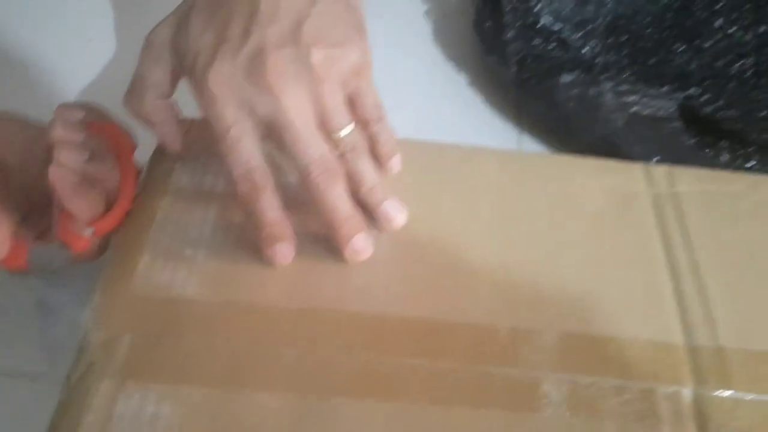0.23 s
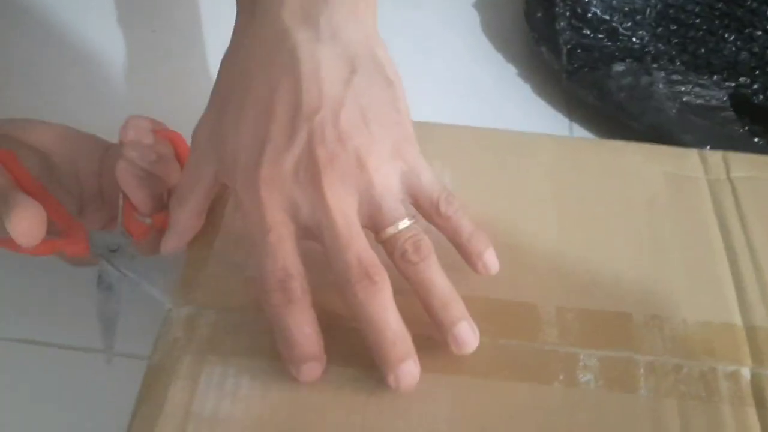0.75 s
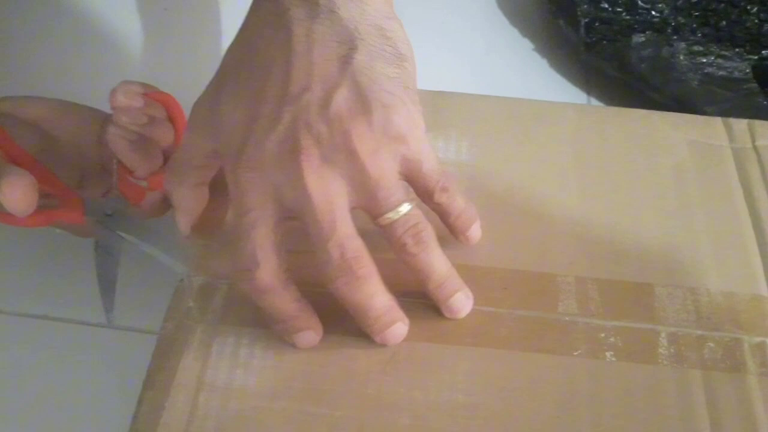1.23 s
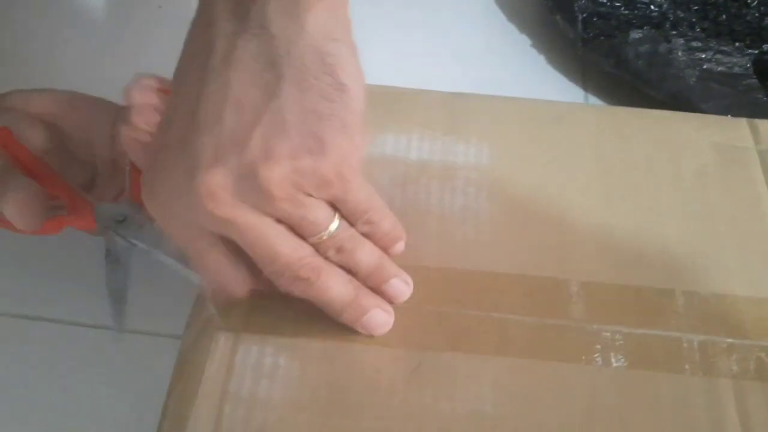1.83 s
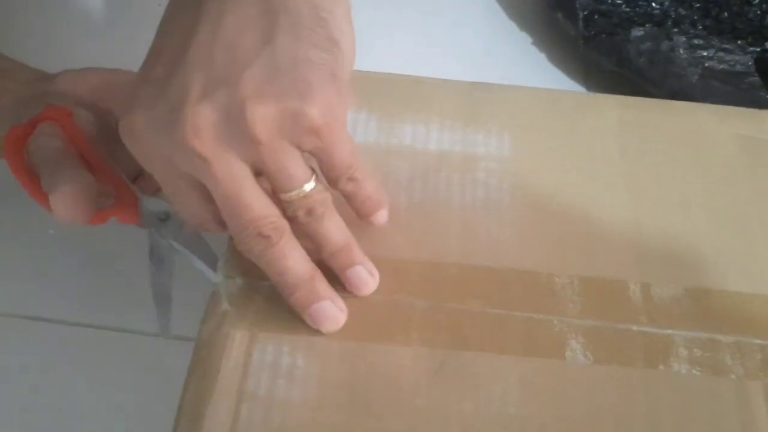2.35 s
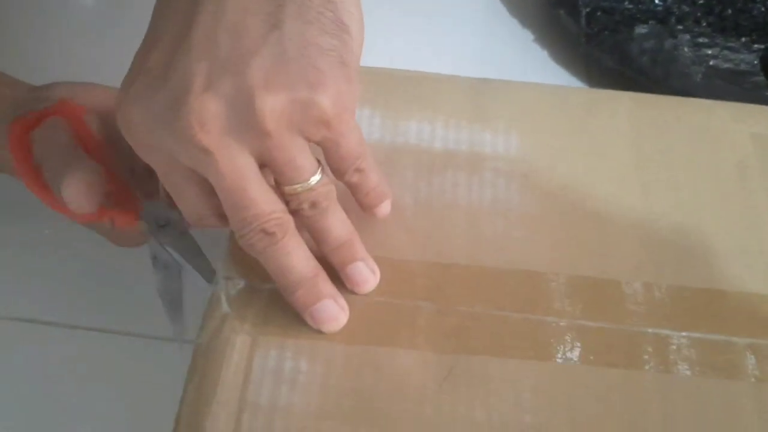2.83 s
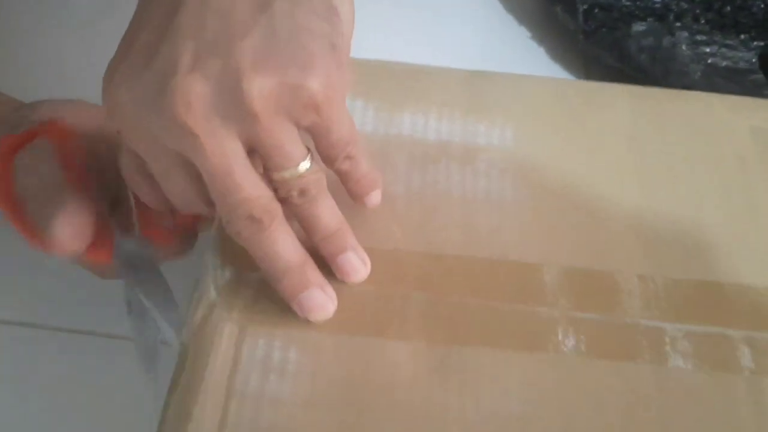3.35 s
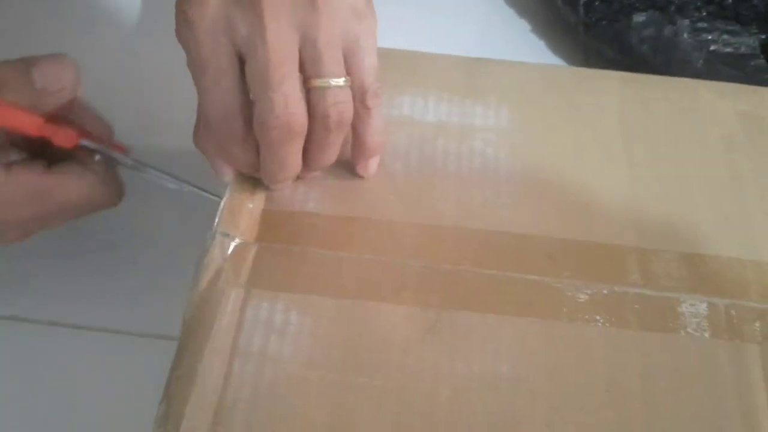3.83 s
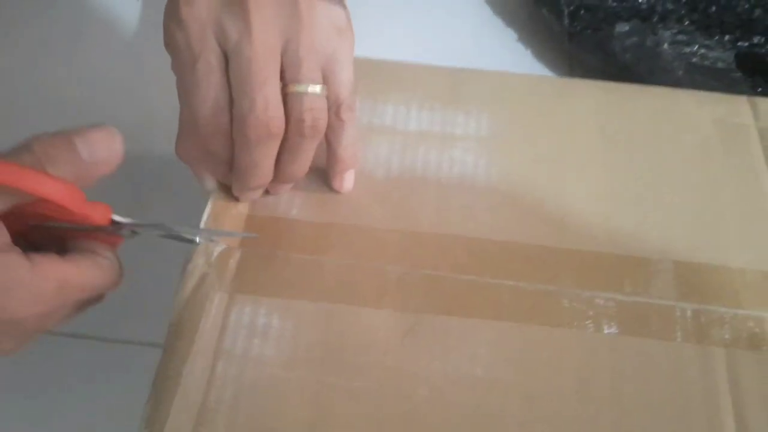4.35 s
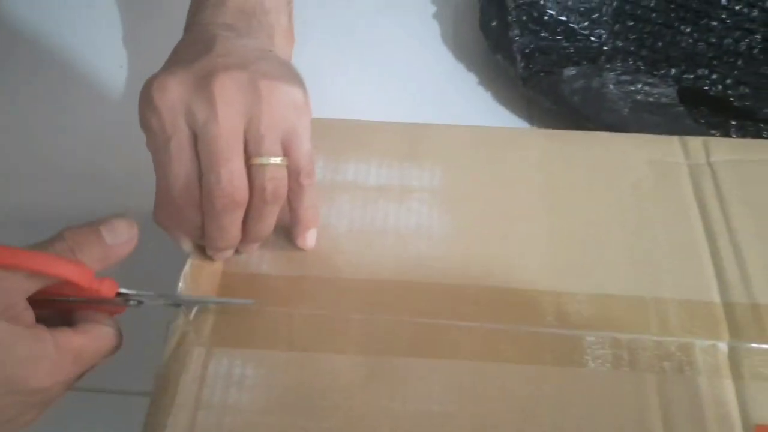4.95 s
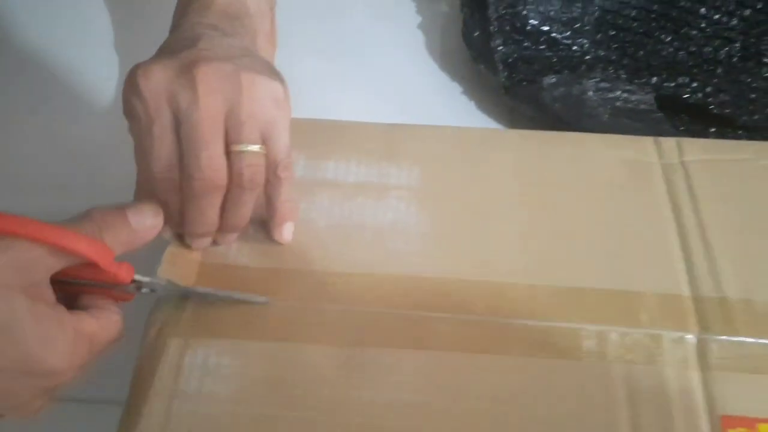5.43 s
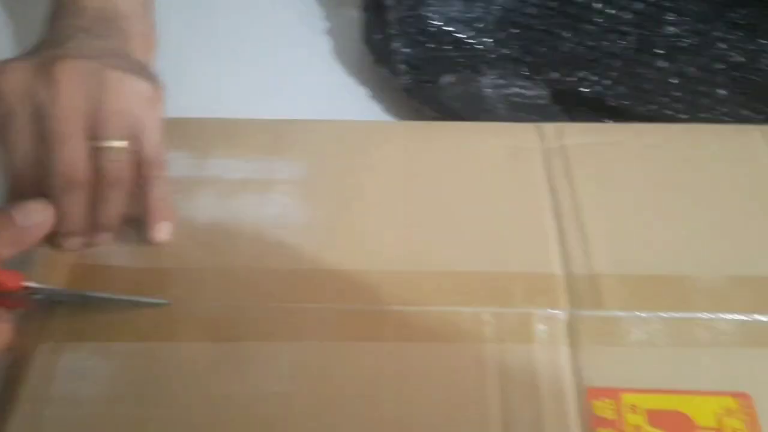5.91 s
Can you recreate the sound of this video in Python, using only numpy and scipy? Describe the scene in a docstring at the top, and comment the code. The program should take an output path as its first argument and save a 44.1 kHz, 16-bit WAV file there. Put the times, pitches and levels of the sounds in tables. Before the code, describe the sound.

Soft hand rubs on a cardboard lid give way to crackly blade strokes, sharp tape snaps and dull box thumps, with a distant engine droning.

```python
"""Scissors work into the packing tape at the edge of a cardboard box, close to a phone in a small tiled room.
First a hand slides over the lid in filtered friction noise, as noise bursts make tape snap and blades knock the box.
Then blade strokes take over, with crackle and breaking fibres; the lid booms as decaying low sines,
and near the end the rasp turns papery in the seam. Throughout, an engine hums through the walls as harmonics
of its firing rate, sinking in speed, picking up and sinking again, over noise and a thin drone."""
import sys
import numpy as np
from scipy import signal
from scipy.fft import rfft, irfft, next_fast_len
from scipy.io import wavfile
from scipy.ndimage import uniform_filter1d, map_coordinates

SR = 44100
rng = np.random.default_rng(int(sys.argv[2]) if len(sys.argv) > 2 else 0)


def output_pcm(signal):
    """Save a mono or channel-first signal as 16-bit PCM at the path in sys.argv[1].

    Samples are clipped to [-1, 1] before scaling.
    """
    pcm = np.clip(np.atleast_2d(signal).T, -1, 1) * 32767
    wavfile.write(sys.argv[1], SR, np.round(pcm).astype(np.int16))


N = 272538

# Colour of the room air. Each row: frequency in Hz, relative density in dB per Hz.
AIR_SPECTRUM = [(20, -30), (45, -16), (95, 13), (200, 4), (320, -11), (600, -20), (1000, -19.5),
                (3000, -28.5), (9000, -36), (13500, -24), (16000, -36)]
# Likeness of left and right in diffuse sound. Each row: frequency in Hz, correlation from 0 to 1.
LEFT_RIGHT_LIKENESS = [(130, 0.97), (290, 0.89), (640, 0.54), (1400, 0), (3000, 0)]
# Reverberation of the tiled room. Each row: frequency in Hz, 60 dB decay time in seconds.
ROOM_DECAY = [(200, 0.36), (14000, 0.1)]
# Speed of the engine. Each row: time in seconds, firing rate in Hz.
FIRING_RATE = [(0, 31.4), (.45, 30.9), (.75, 30.1), (1, 29.85), (1.43, 28.95), (2.42, 27.45), (3.75, 24.5),
               (4.33, 27.9), (5.1, 29.35), (5.56, 29.4), (5.75, 27.1), (6.17, 25.1)]
# Swelling and fading of the third order. Each row: time in seconds, level in dB.
THIRD_ORDER_LEVEL = [(0, -54.5), (.68, -44.5), (1.1, -52), (1.85, -52.5), (2.3, -72), (5.35, -68),
                     (5.7, -52)]
# Swelling and fading of the fourth order. Each row: time in seconds, level in dB.
FOURTH_ORDER_LEVEL = [(.45, -62), (.77, -38.5), (1, -40.5), (1.398, -29), (1.7, -38), (2.05, -40),
                      (2.48, -46.5), (2.7, -63), (3.2, -58), (3.6, -45), (4.05, -61), (4.3, -49.5),
                      (5.1, -48), (5.27, -74), (5.5, -49)]
# Swelling and fading of the fifth order. Each row: time in seconds, level in dB.
FIFTH_ORDER_LEVEL = [(0, -51.5), (.7, -43), (.92, -60), (1.15, -48.5), (2.4, -58.5), (3, -62), (4.1, -57),
                     (4.42, -47), (4.95, -45), (5.3, -57.5), (5.5, -46), (6.17, -55.5)]
# Colour of the clatter through the walls. Each row: frequency in Hz, relative density in dB per Hz.
CLATTER_SPECTRUM = [(100, -10.5), (200, 4), (340, 1), (650, -5), (1100, -30), (3000, -29.5)]
# Flexing of the whole lid under the hand. Each row: start in seconds, level in dB before the slow rise.
LID_FLEXES = [(3.74, -28.5), (3.859, -33), (5.788, -28), (5.86, -30), (6.07, -27.5)]
# Resonances of the box. Each row: centre in Hz, width in Hz, gain in dB.
BOX_MODES = [(178, 74, -4), (259.5, 42, 2.5), (285, 25.6, 6.5), (345.3, 29.6, 5.5), (443, 28, -1.5),
             (526, 80, -3), (660, 147, -3.5), (965, 665, -12), (1163, 237, -10)]
# Blows on the box. Each row: start in seconds, relative level in dB, relative crunch level in dB.
BOX_KNOCKS = [(0.387, -27, -16.5), (0.836, -41, -5.5), (1.859, -31.5, -21.5), (2.756, -25.5, -9),
              (2.814, -26, -16.5), (2.821, -24, -19.5), (3.240, -25.5, -19), (3.250, -29, -12),
              (3.287, -26, -14), (3.414, -29.5, -13.5), (3.735, -25, -27), (4.994, -33, -15),
              (5.051, -28.5, -12.5), (5.062, -26, -14.5), (5.709, -25.5, -13), (5.837, -29.5, -7.5)]
# Tape snaps and blade ticks. Each row: start in seconds, relative level in dB, centre in Hz.
TAPE_SNAPS = [(0.3886, -24, 10500), (0.603, -38.5, 9500), (0.7702, -30.5, 5000), (1.5878, -34, 4500),
              (2.1062, -39, 6900), (2.322, -25.5, 10000), (2.7556, -18, 12500), (2.812, -30, 1700),
              (2.816, -29.5, 1300), (2.892, -33.5, 6000), (3.1375, -34, 13700), (3.288, -26.5, 11400),
              (3.290, -35, 3500), (3.3554, -30, 11000), (3.394, -40, 12700), (3.414, -29.5, 11600),
              (3.5635, -29, 13200), (3.569, -36, 12900), (3.6013, -32, 12500), (4.596, -33, 13500),
              (4.904, -48.5, 4200), (4.914, -49, 4600), (4.9216, -35, 5500), (5.004, -35, 1600),
              (5.0638, -29.5, 12700), (5.4522, -26.5, 5000), (5.7100, -20.5, 1700), (5.8386, -24, 11000)]
# Lean of the direct crack to one side. Each row: centre in Hz, left over right in dB.
SNAP_LEAN = [(1600, 4.5), (4500, 10), (12000, 14)]
# Colour of the rubbing hiss and tape crackle. Each row: frequency in Hz, relative density in dB per Hz.
HISS_SPECTRUM = [(1000, -19), (2500, -3), (4800, -0.5), (7000, -3), (8500, -1), (9900, -6.5), (12500, 0),
                 (16000, -6.5)]
# Colour of the biting blade and the crunch. Each row: frequency in Hz, relative density in dB per Hz.
RASP_SPECTRUM = [(300, -13), (800, -10.5), (1300, -3.5), (1900, -3.5), (3300, -7), (6000, -15.5),
                 (16000, -14.5)]
# Hand slides over the lid. Each row: start in seconds, length in seconds, relative hiss and board levels in dB.
HAND_SLIDES = [(0, 0.033, -64, -57), (.5, 0.41, -64.5, -53), (.79, 0.11, -57, -61), (1.01, 0.041, -68, -61),
               (1.36, 0.65, -57.5, -52.5), (1.81, 0.028, -56, -47.5), (1.88, 0.26, -81.5, -59),
               (2.04, 0.11, -55.5, -47), (2.33, 0.079, -59.5, -44.5), (2.5, 0.21, -67.5, -55)]
# Blade pushes into tape and board. Each row: start in seconds, length in seconds, relative hiss and board
# levels in dB.
BLADE_PUSHES = [(.16, 0.039, -56, -45), (.39, 0.082, -61, -48), (2.75, 0.038, -52, -39),
                (2.85, 0.099, -66, -48.5), (3.18, .05, -61.5, -46.5), (3.25, 0.21, -59.5, -45.5),
                (3.595, 0.025, -49.5, -45), (3.72, 0.069, -51, -48), (3.86, 0.12, -69, -63),
                (4.01, 0.018, -64, -77), (4.24, 0.11, -60.5, -54), (4.62, 0.37, -72.5, -60),
                (4.97, 0.11, -62.5, -44), (5.21, 0.18, -58.5, -51), (5.455, 0.065, -53, -42.5),
                (5.665, 0.092, -52, -44), (5.78, 0.018, -49, -47), (5.92, 0.076, -58.5, -55),
                (6.1, 0.22, -47.5, -42.5)]

TOP_HZ = 15950
PORT_LAG = SR // 5000  # samples by which direct sound reaches the right port later
SECOND_ORDER_DB, SIXTH_ORDER_DB, SEVENTH_ORDER_DB = -13, -10.5, -12.5  # relative to the fifth order
CRACK_T60, CRACK_CYCLES = .0016, 8  # a crack's decay time: seconds, plus cycles of its centre frequency
HAND_BITE_DB, BLADE_BITE_DB = -3.5, -1.5  # rasp relative to hiss
TEAR_DB = -13.5  # breaking fibres relative to the blade's board level in the table
REST_BOARD_DB = -64.5  # hand resting on the lid, on the scale of the board levels in the tables


def amp(db):
    """Level to amplitude: 20 dB is a factor of ten."""
    return 10 ** (np.asarray(db) / 20)


def unit(x):
    """Normalisation: scale to rms 1."""
    return x / np.sqrt(np.mean(x ** 2) + 1e-20)


def along(points, hz):
    """Interpolation of (Hz, value) points on a logarithmic frequency axis."""
    f, v = np.transpose(points)
    return np.interp(np.log(hz + 1), np.log(f + 1), v)


def curves(rows):
    """Linear interpolation in time: one value per sample for each column after the first."""
    s, *cols = np.transpose(rows)
    return [np.interp(np.arange(N) / SR, s, c) for c in cols]


def wobble(rate):
    """Slow random modulation: a smooth curve through `rate` random knots a second."""
    knots = rng.standard_normal(int(N * rate / SR) + 4)
    return map_coordinates(knots, [np.arange(N) * rate / SR])


def filtered(x, response):
    """Linear filtering: the spectrum of x times a response of frequency."""
    n = x.shape[-1]
    m = next_fast_len(n + SR // 4)
    return irfft(rfft(x, m) * response(np.fft.rfftfreq(m, 1 / SR)), m)[..., :n]


def coloured(x, spectrum):
    """Spectral shaping: x weighted by (Hz, dB) points."""
    return filtered(x, lambda hz: amp(along(spectrum, hz)))


def resonate(x, modes):
    """Modal resonance: parallel second-order modes of (Hz, width, dB), alternating in sign."""
    def response(f):
        total = 0
        for k, (centre, width, db) in enumerate(modes):
            damping = 1j * f * width
            total = total + (-1) ** k * amp(db) * damping / (centre * centre - f * f + damping)
        return total
    return filtered(x, response)


def spread(pair):
    """Diffuse-field coherence: two unrelated signals become left and right, alike in the bass only."""
    def mid_side_weights(hz):
        angle = np.arccos(np.clip(along(LEFT_RIGHT_LIKENESS, hz), -1, 1)) / 2
        return np.array([np.cos(angle), np.sin(angle)])
    mid, side = filtered(pair, mid_side_weights)
    return np.array([mid + side, mid - side])


def diffuse_noise(n):
    """Diffuse sound field: n samples of two-channel noise."""
    return spread(rng.standard_normal((2, n)))


def pan(left_db):
    """Level difference between the channels, shared equally as boost and cut."""
    return amp([[left_db / 2], [-left_db / 2]])


def lagged(x):
    """Arrival-time difference: the right channel follows the left."""
    return np.array([x, np.roll(x, PORT_LAG)])


def add(track, s, sound):
    """Superposition: mix a sound into the track at time s."""
    part = track[:, max(round(s * SR), 0):][:, :sound.shape[-1]]
    part += sound[..., :part.shape[-1]]


def roomy(x, wet_db):
    """Reverberation: the left channel feeds a diffuse tail whose decay depends on frequency."""
    hz, t, z = signal.stft(rng.standard_normal((2, SR // 2)), SR, nperseg=256)
    decay = amp(-60 * t / along(ROOM_DECAY, hz)[:, None])
    tail = spread(signal.istft(z * decay, SR, nperseg=256)[1])
    echo = signal.fftconvolve(x[:1], tail / np.linalg.norm(tail[0]), axes=1)
    return x + amp(wet_db) * echo[:, :x.shape[-1]]


def reflected(x, echo_db, count=10):
    """Early reflection: floor and walls return a few copies, different at each port."""
    walls = np.zeros((2, SR // 70))
    for port in walls:
        delays = rng.integers(SR // 1000, len(port), count)
        port[delays] = amp(echo_db) * rng.choice([-1, 1], count)
    walls[:, 0] = 1  # direct sound
    return unit(signal.fftconvolve(x, walls, axes=1)[:, :N])


def room_air(drone_hz=313):
    """Stationary noise: background rumble and faint hiss, with a thin drone unsteady in phase."""
    drone = np.sin(2 * np.pi * drone_hz * np.arange(N) / SR + .5 * wobble(8.3))
    air = unit(coloured(diffuse_noise(N), AIR_SPECTRUM))
    return (amp(-56) * air + amp(-63.0) * drone) * pan(3.0)


def engine(firing_wander=0.0027, sway_db=0.92, clatter_db=-56, clatter_follows=0.33, throb=0.22):
    """Harmonic orders of the firing rate glide, swell and fade; a dull clatter is modulated by each firing."""
    firing_hz, = curves(FIRING_RATE)
    phase = 2 * np.pi * np.cumsum(firing_hz * (1 + firing_wander * wobble(20))) / SR
    third, = curves(THIRD_ORDER_LEVEL)
    fourth, = curves(FOURTH_ORDER_LEVEL)
    fifth, = curves(FIFTH_ORDER_LEVEL)
    levels_db = [fifth + SECOND_ORDER_DB, third, fourth, fifth,
                 fifth + SIXTH_ORDER_DB, fifth + SEVENTH_ORDER_DB]
    hum = np.zeros(N)
    for order, db in enumerate(levels_db, 2):
        gain = amp(db + sway_db * wobble(6.5))
        hum += gain * np.cos(order * phase + 2 * np.pi * rng.random())
    clatter = coloured(diffuse_noise(N), CLATTER_SPECTRUM)
    clatter = unit(clatter * (1 + throb * np.cos(phase)))
    # the clatter follows the strongest order in part
    loudest_db = np.max(levels_db, axis=0)
    clatter *= amp(clatter_db + clatter_follows * (loudest_db - loudest_db.max()))
    return (np.sqrt(2) * hum + clatter) * pan(2.96)


def lid(hz=69, t60=0.19, rise=0.025):
    """Mass on an air spring: the pressed lid sways on the air inside the box with a soft, deep boom."""
    out, t = np.zeros((2, N)), np.arange(SR // 2) / SR
    for s, db in LID_FLEXES:
        sway = np.sin(2 * np.pi * hz * (1 + 0.038 * rng.standard_normal()) * t)
        envelope = amp(db - 60 * t / t60) * (1 - np.exp(-t / rise))
        add(out, s, envelope * sway * pan(1.7))
    return out


def knocks(push_t60=0.009, crunch_t60=0.041, detune=0.031):
    """Impulsive excitation of modes: a short crumple rings the hollow box, retuned a little at each blow."""
    out, t = np.zeros((2, N)), np.arange(SR // 3) / SR
    for s, db, crunch_db in BOX_KNOCKS:
        modes = [(hz * (1 + detune * rng.standard_normal()), width, gain_db)
                 for hz, width, gain_db in BOX_MODES]
        thud = resonate(diffuse_noise(len(t)) * amp(-60 * t / push_t60), modes)
        crunch = coloured(diffuse_noise(len(t)), RASP_SPECTRUM) * amp(-60 * t / crunch_t60)
        blow = amp(-25.5) * unit(thud) * pan(4.5)
        blow = blow + amp(crunch_db - 20.5) * unit(crunch) * pan(5.7)
        add(out, s, amp(db) * roomy(blow, wet_db=-7.0))
    return out


def snaps(scatter_t60=0.039, scatter_db=-19, width=1.46):
    """Sudden release of tension: a crack, slower when dull, reaches the left port first and the lid scatters it."""
    out, t = np.zeros((2, N)), np.arange(SR // 3) / SR
    for s, db, hz in TAPE_SNAPS:
        crack = rng.standard_normal(len(t)) * amp(-60 * t / (CRACK_T60 + CRACK_CYCLES / hz))
        direct = pan(along(SNAP_LEAN, hz)) * lagged(crack)
        scatter = rng.standard_normal((2, len(t))) * amp(scatter_db - 60 * t / scatter_t60)
        film = [(hz, hz * width, 0)]
        snap = resonate(resonate(direct + scatter, film), film)
        add(out, s, amp(db - 28.5) * roomy(unit(snap), wet_db=-10))
    return out


def strokes(rows, attack_db_per_s, arch_db, release_db_per_s):
    """Stroke envelope: hiss and board power build up, are greatest at mid travel and die away."""
    power, now = np.zeros((2, N)), np.arange(N) / SR
    for start, length, hiss_db, board_db in rows:
        t = now - start
        travel = np.clip(2 * t / length - 1, -1, 1)
        attack = attack_db_per_s * np.minimum(t, 0)
        release = release_db_per_s * np.maximum(t - length, 0)
        shape_db = attack - arch_db * travel ** 2 - release
        power += (amp([[hiss_db], [board_db]]) * amp(np.maximum(shape_db, -120))) ** 2
    return power


def friction(rate, spread_db, grain_db):
    """Stick-slip friction: tiny slips of uneven size, heard directly over their diffuse wash."""
    sizes = amp(spread_db * np.minimum(rng.exponential(size=N), 3))
    slips = (rng.random(N) < rate / SR) * rng.choice([-1, 1], N) * sizes
    return diffuse_noise(N) + amp(grain_db) * pan(9.4) * unit(lagged(slips))


def shifting(x, depth_db):
    """Time-varying spectrum: the colour of a rub shifts in patches as the contact moves."""
    z = signal.stft(x, nperseg=512)[2]
    field = uniform_filter1d(rng.standard_normal(z.shape[1:]), size=9, axis=0)
    field = uniform_filter1d(field, size=14, axis=1)
    return unit(signal.istft(z * amp(depth_db * unit(field)), nperseg=512)[1][:, :N])


def crackle(rate, spread_db):
    """Random impulse train: sparse ticks of uneven size as the tape film wrinkles under pressure."""
    ticks = (rng.random(N) < rate / SR) * amp(spread_db * rng.uniform(-0.64, 1, N))
    return unit(coloured(lagged(ticks), HISS_SPECTRUM))


def fibres(rate=170, hz=1100, scatter_octaves=0.87, cycles=7, spread_db=4, clump_db=4.0):
    """Brittle fracture: paper fibres break in clusters, each a decaying sine with a pitch of its own."""
    out, t = np.zeros((2, N)), np.arange(SR // 50) / SR
    for when, pitch, size, side in rng.standard_normal((int(rate * N / SR), 4)):
        grain_hz = min(hz * 2 ** (scatter_octaves * pitch), TOP_HZ)
        # each grain falls 60 dB in a fixed number of its own cycles
        envelope = amp(spread_db * np.clip(size, -2, 2) - 60 * t * grain_hz / cycles)
        grain = np.sin(2 * np.pi * grain_hz * t) * envelope
        add(out, (when % 1) * N / SR, grain * pan(2 * side))
    return unit(out * amp(clump_db * np.clip(wobble(45), -2, 2)))


def sliding(slit_s=5.2, slit_hz=1900):
    """Friction-driven radiation: skin and steel rub tape and board in hiss, rasp, box rumble and tearing."""
    hand, hand_board = strokes(HAND_SLIDES, attack_db_per_s=463, arch_db=3.0, release_db_per_s=104)
    blade, blade_board = strokes(BLADE_PUSHES, attack_db_per_s=356, arch_db=0.5, release_db_per_s=189)
    # independent sources add in power
    hiss_gain = np.sqrt(hand + blade)
    rasp_gain = np.sqrt(hand * amp(HAND_BITE_DB) ** 2 + blade * amp(BLADE_BITE_DB) ** 2)
    board_gain = np.sqrt(hand_board + blade_board + amp(REST_BOARD_DB) ** 2)
    # the grip changes slowly, and the contact sticks and slips quickly within it
    grip_db = 1.5 * wobble(16) + 1.4 * wobble(130)

    rub = coloured(friction(rate=900, spread_db=-13.5, grain_db=-7.0), HISS_SPECTRUM)
    hiss = shifting(rub, depth_db=1.97) + amp(-10.0) * crackle(rate=40, spread_db=6.0)

    scrape = friction(rate=500, spread_db=4, grain_db=-0.5)
    # once the blade runs in the seam, the cut edge of the board gives the rasp a papery resonance
    in_seam = np.clip((np.arange(N) / SR - slit_s) * 20, 0, 1)
    open_rasp = unit(coloured(scrape, RASP_SPECTRUM))
    papery_rasp = amp(-1.0) * unit(resonate(scrape, [(slit_hz, 560, 0)]))
    rasp = (1 - in_seam) * open_rasp + in_seam * papery_rasp

    surface = hiss_gain * reflected(hiss, echo_db=-17.0) + rasp_gain * reflected(rasp, echo_db=-15)
    rumble = unit(resonate(friction(rate=150, spread_db=-1, grain_db=-7.0), BOX_MODES))
    board = board_gain * amp(1.53 * wobble(25)) * rumble
    tearing = amp(TEAR_DB) * np.sqrt(blade_board) * reflected(fibres(), echo_db=-8.5) * pan(12)
    return (amp(grip_db + 2.0) * surface + amp(-2.5) * board) * pan(0.74) + tearing


def scene():
    """Superposition of room, engine and the work on the box."""
    return room_air() + engine() + lid() + knocks() + snaps() + sliding()


def record(dry):
    """Band limiting: the phone keeps nothing above its upper limit."""
    return filtered(dry, lambda hz: hz < TOP_HZ)


dry = scene()
out = record(dry)
output_pcm(out)
```